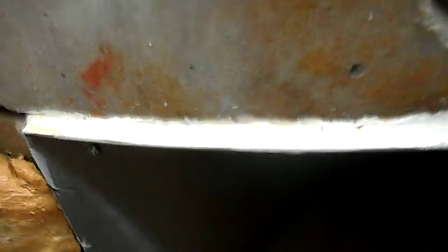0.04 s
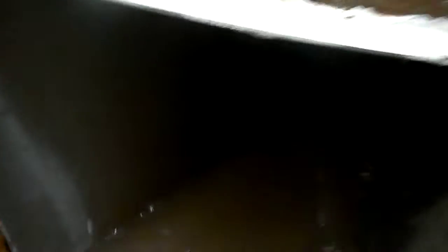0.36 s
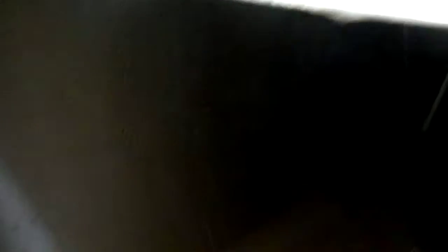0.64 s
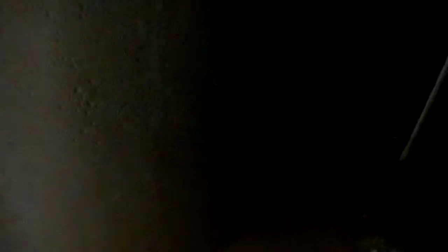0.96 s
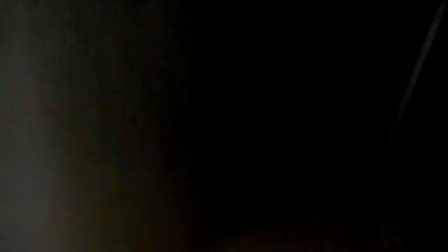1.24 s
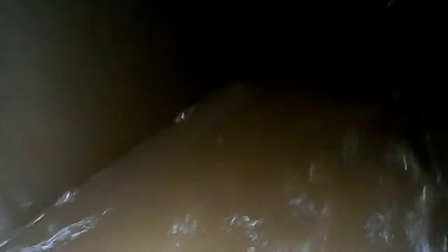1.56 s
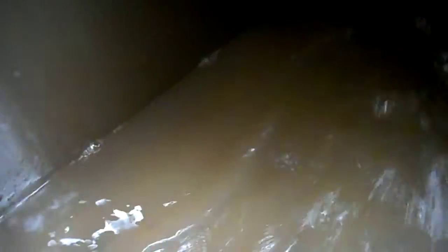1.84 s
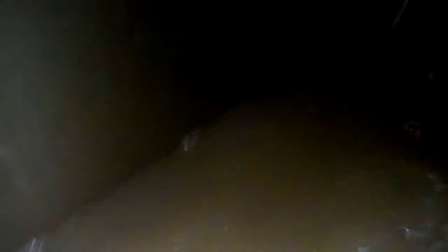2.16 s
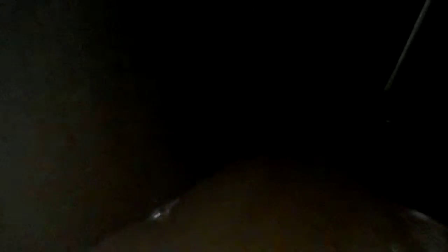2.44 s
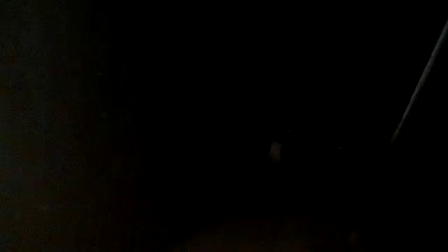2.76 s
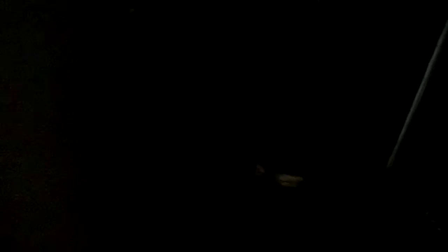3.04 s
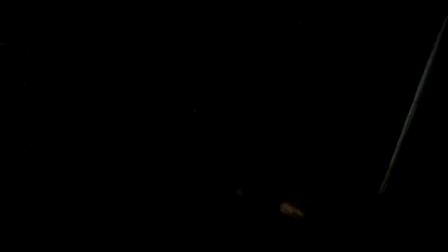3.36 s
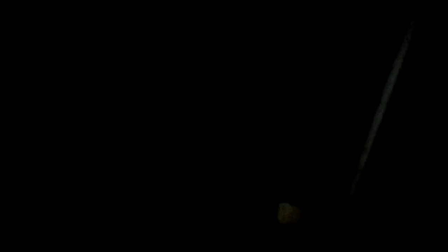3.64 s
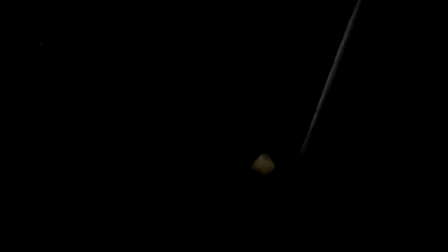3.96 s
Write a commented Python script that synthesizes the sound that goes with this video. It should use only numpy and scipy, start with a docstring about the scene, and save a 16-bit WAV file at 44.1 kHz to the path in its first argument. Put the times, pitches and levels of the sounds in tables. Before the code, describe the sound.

Turbulent water pours through a concrete drain channel, heard up close as a steady, foaming roar. Spray hisses, drops spatter, and brief splashes and hollow glugs keep breaking through, with a faint boom from the chamber underneath.

```python
"""Stormwater rushes through a concrete chamber, close by: white water with bubbles ringing out of it.
The churning flow throws up hissing spray and ticking droplets, roars, and gurgles in the hollows.
Now and then an air pocket glugs, a wave slaps, or the flow eases for a moment.
A low boom builds underneath, and the chamber's standing waves colour it all."""
import sys
import numpy as np
from scipy import signal
from scipy.fft import rfft, irfft, next_fast_len
from scipy.io import wavfile
from scipy.ndimage import uniform_filter1d, map_coordinates

SR = 44100
rng = np.random.default_rng(int(sys.argv[2]) if len(sys.argv) > 2 else 0)


def transcribe(signal):
    """Save signal, clipped to [-1, 1], as a 16-bit WAV file at the path in sys.argv[1]."""
    frames = np.atleast_2d(signal).T
    limited = np.clip(frames, -1, 1)
    pcm = np.round(limited * 32767).astype(np.int16)
    wavfile.write(sys.argv[1], SR, pcm)


N = 176400

TOP_HZ = 10700
SURGE_PER_S = 48  # quick swells of the flow and the spray
CHURN_DB, CHURN_PER_S = 1.04, 16  # slow heaving of the roar and the boom


def rush():
    """White water, with single bubbles ringing out of it, each rising in pitch."""
    # level ride of the foam (time [s], level [dB])
    foam_level = [(0, -26.5), (.45, -26), (.95, -24.5), (1.3, -25.5), (1.8, -25.5), (2.6, -25), (3.1, -25),
                  (4, -25)]
    # midrange tone of the foam (frequency [Hz], relative level [dB])
    foam_tone = [(40, -63), (150, -44), (500, -18.5), (800, -1.5), (1250, 1), (1800, 0), (2500, 0),
                 (3500, -4.5), (5000, -17.5), (9000, -35), (12000, -59)]
    foam = amp(curve(foam_level)) * coloured(turbulence(patchy_db=1.0), foam_tone)
    bubbles = grains(count=2400, centre_hz=1406, spread=0.4536, cycles=25, scatter_db=4.5,
                     rise=0.094, samples=1400)
    bubbles = coloured(bubbles, [(60, -60), (400, -34), (650, -13.5), (1000, -2), (2000, -4.5)])
    return foam + amp(-34) * bubbles


def spray():
    """Thrown-up spray: a fine, fluttering hiss and the ticks of falling droplets."""
    # level ride of the spray (time [s], level [dB])
    spray_level = [(0, -27), (.42, -27), (.9, -28), (1.55, -28.5), (2.3, -29.5), (2.6, -28.5), (3.2, -30),
                   (3.6, -30.5), (3.9, -27.5), (4, -30.5)]
    # bright tone of the hiss (frequency [Hz], relative level [dB])
    hiss_tone = [(60, -67), (500, -24), (1800, -13), (3000, -2.5), (4000, -1), (5000, -2), (6500, -4.5),
                 (8000, -9), (9000, -13), (10000, -19.5), (10600, -36.5)]
    tick_tone = [(60, -45), (1000, -15), (4000, 0.5), (7500, -3.5), (9500, -4.5), (10600, -17)]
    hiss = coloured(turbulence(patchy_db=1.0), hiss_tone)
    ticks = grains(count=6000, centre_hz=5300, spread=0.44, cycles=1.7, scatter_db=4.0, samples=120)
    flutter_db = .5 * wobble(SURGE_PER_S)
    return amp(curve(spray_level) + flutter_db) * (hiss + amp(-6.5) * coloured(ticks, tick_tone))


def roar():
    """The deep, heaving churn of the main flow."""
    # level ride of the roar (time [s], relative level [dB])
    roar_level = [(0, -35.5), (.45, -34), (.62, -35.5), (.8, -32.5), (1.17, -35.5), (1.35, -32.5),
                  (1.6, -36), (2.1, -33), (2.7, -34.5), (3.3, -33.5), (4, -35)]
    # low-mid body of the roar (frequency [Hz], relative level [dB])
    roar_tone = [(60, -45), (140, -21.5), (230, -3), (310, -1), (450, 1.5), (600, 1), (740, 6), (1100, -7),
                 (2000, -14), (5000, -60)]
    level_db = curve(roar_level) + 1.3 + CHURN_DB * wobble(CHURN_PER_S)
    return amp(level_db) * coloured(turbulence(patchy_db=-0.25), roar_tone)


def gurgle():
    """The shifting flow rings each hollow in one long, wavering swell over a quieter steady ring."""
    # ringing hollows (pitch [Hz], half-width [Hz], level [dB], peak time [s], swell length [s])
    hollows = [(845, 39, -37, 1.97, 1.6), (891, 28, -37, 2.9, 1.3), (1046, 40, -37.5, 2, 1.8),
               (990, 55, -36.5, 3.83, 0.45), (1370, 110, -36, 3.35, 1.2), (1636, 83, -35.5, 3.57, 0.59)]
    floor_db, waver_db = -10.5, 1.5
    out = np.zeros(N)
    for hz, width, db, s, length in hollows:
        drive = np.maximum(swell(s, length), amp(floor_db)) * amp(waver_db * wobble(15))
        ring = filtered(rng.standard_normal(N), lambda f: 1 / (1 + ((f - hz) / width) ** 2))
        out += amp(db) * drive * unit(ring)
    return out


def glugs():
    """Large air pockets collapse: each note swells quickly, rises a little and rings away unsteadily."""
    # air pockets (start [s], pitch [Hz], peak level [dB], length [s])
    pockets = [(0.641, 808, -27.5, 0.044), (0.897, 521, -34, 0.1), (1.09, 1055, -30, 0.053),
               (1.157, 1033, -26.5, 0.073), (1.386, 1010, -27, 0.036), (1.488, 877, -22.5, 0.034),
               (1.562, 857, -26.5, .04), (1.824, 1045, -28.5, 0.057), (1.98, 1020, -28.5, .035),
               (2.03, 834, -27.5, .05), (2.125, 1050, -28.5, .04), (2.133, 899, -26.5, .04),
               (2.47, 905, -30, .04), (2.817, 739, -27, 0.03), (2.874, 895, -28, 0.063),
               (3.003, 1380, -25, 0.047), (3.083, 895, -26, .05), (3.295, 1272, -30, 0.04)]
    rise, waver = .02, 0.0122  # shares of the pitch: climb per length, unsteadiness
    out = np.zeros(N)
    for s, hz, db, length in pockets:
        age = np.clip((np.arange(N) / SR - s) / length, 0, 10)
        pitch = hz * (1 + rise * (np.minimum(age, 2) - .5) + waver * wobble(110))
        envelope = (2 * age) ** 2 * np.exp(2 - 4 * age)
        out += amp(db) * envelope * np.sin(2 * np.pi * np.cumsum(pitch) / SR)
    return out


def splashes():
    """Waves slap: each is a short swell of noise in its own band."""
    # wave slaps (peak time [s], relative level [dB], band centre [Hz], length [s])
    slaps = [(.315, -31.5, 7560, 0.06), (0.668, -29, 990, 0.045), (0.499, -32, 4000, .22),
             (0.51, -35, 5900, 0.016), (.745, -26, 4500, 0.015), (0.938, -25, 2900, 0.02),
             (1.087, -21, 2180, 0.023), (1.089, -28, 4200, .025), (1.313, -26.5, 2100, 0.03),
             (1.492, -25.5, 1500, 0.02), (1.509, -30, 3800, .05), (1.637, -29, 650, 0.048),
             (2.049, -26.5, 1730, 0.047), (2.059, -29, 6650, 0.026), (2.146, -25, 970, 0.037),
             (2.279, -28, 2150, .025), (2.485, -22, 4050, 0.017), (2.677, -24, 1320, 0.032),
             (2.843, -32, 8350, 0.016), (2.912, -22.5, 1600, 0.017), (3.017, -23, 1700, 0.013),
             (3.311, -24, 1490, 0.025), (3.675, -33, 1700, 0.038), (3.722, -27, 6800, 0.017),
             (3.921, -26, 2300, 0.06)]
    half_width_octaves, trim_db = 0.4, -1.25
    size = SR // 2
    t = np.arange(size) / SR - size / SR / 2  # zero at the slap's peak
    hz = np.fft.rfftfreq(size, 1 / SR)
    out = np.zeros(N + size)
    for s, db, centre_hz, length in slaps:
        octaves = np.log2((hz + 1) / centre_hz)
        band = np.exp(-.5 * (octaves / half_width_octaves) ** 2) / (1 + (hz / 9600) ** 16)
        noise = unit(irfft(rfft(rng.standard_normal(size)) * band, size))
        envelope = np.exp(-2 * (t / length) ** 2)
        out[round(s * SR):][:size] += amp(db + trim_db) * envelope * noise
    return out[size // 2:][:N]


def spatter():
    """Larger drops strike close by with sharp, broadband ticks."""
    tick_tone = [(60, -51), (500, -8), (1500, 6), (7000, -3), (9500, -4), (10600, -23)]
    ticks = grains(count=420, centre_hz=3970, spread=0.33, cycles=0.91, scatter_db=2.0, samples=80)
    return amp(-42) * coloured(ticks, tick_tone)


def boom():
    """The chamber's bass heaves and builds as the listening point moves inside."""
    # low end of the chamber (frequency [Hz], relative level [dB])
    boom_tone = [(25, -35), (45, -32), (80, -11), (130, -6), (170, 1), (230, -4.5), (400, -33), (1000, -55)]
    build_db_per_s = 1.1
    level_db = -53.5 + build_db_per_s * (np.arange(N) - N / 2) / SR + CHURN_DB * wobble(CHURN_PER_S)
    return amp(level_db) * coloured(rng.standard_normal(N), boom_tone)


def chamber(water):
    """Standing waves in the concrete chamber lift some low bands and hollow out others."""
    # peaks and notches of the standing waves (centre [Hz], width [Hz], gain [dB])
    modes = [(82, 10, -1), (100, 7.4, -8), (174, 12, 2.5), (205.4, 10.8, -14.5), (235, 15, 2),
             (260, 11, -3), (503, 30, 3.5), (595, 36, 2)]

    def response(hz):
        return amp(sum(db * np.exp(-.5 * ((hz - centre) / width) ** 2) for centre, width, db in modes))
    return filtered(water, response)


def turbulence(patchy_db):
    """White noise with short patches of random gain across time and frequency."""
    spectrum = signal.stft(rng.standard_normal(N), nperseg=512)[2]
    patches = uniform_filter1d(rng.standard_normal(spectrum.shape), size=9, axis=0)
    patches = unit(uniform_filter1d(patches, size=7, axis=1))
    return unit(signal.istft(spectrum * amp(patchy_db * patches), nperseg=512)[1][:N])


def grains(count, centre_hz, spread, cycles, scatter_db, samples, rise=0):
    """Damped sine pings at random times, pitches and strengths; rise bends each one upward."""
    when, pitch, strength = rng.random(count), rng.standard_normal(count), rng.exponential(size=count)
    hz = np.clip(centre_hz * np.exp(spread * pitch), 250, TOP_HZ)[:, None]
    turns = hz * np.arange(samples) / SR
    age = turns / cycles
    bend = 1 + rise * np.minimum(age, 2) / 2
    envelope = np.exp(-np.pi * age) * (1 - np.exp(-2 * turns))
    gain = amp(scatter_db * np.minimum(strength, 4))[:, None]
    pings = gain * envelope * np.sin(2 * np.pi * turns * bend)
    at = (when * N).astype(int)[:, None] + np.arange(samples)
    return unit(np.bincount(at.ravel(), pings.ravel(), N)[:N])


def amp(db):
    """Decibels to gain."""
    return 10 ** (np.asarray(db) / 20)


def unit(x):
    """x scaled to rms 1."""
    return x / np.sqrt(np.mean(x ** 2) + 1e-20)


def curve(rows):
    """Straight ramps through (time [s], value) points."""
    return np.interp(np.arange(N) / SR, *np.transpose(rows))


def swell(s, length):
    """A bell-shaped swell around time s."""
    return np.exp(-2 * ((np.arange(N) / SR - s) / length) ** 2)


def wobble(rate):
    """A smooth random curve with rate knots a second."""
    return map_coordinates(rng.standard_normal(2048), [np.arange(N) * rate / SR], mode="wrap")


def filtered(x, response):
    """x through an EQ whose gain is response(hz)."""
    size = next_fast_len(N + SR // 2)
    return irfft(rfft(x, size) * response(np.fft.rfftfreq(size, 1 / SR)), size)[:N]


def coloured(x, tone):
    """x shaped by (frequency [Hz], relative level [dB]) points, at rms 1."""
    f, db = np.transpose(tone)
    return unit(filtered(x, lambda hz: amp(np.interp(np.log(hz + 1), np.log(f), db))))


def scene():
    """The flow surges and eases as one; boom, slaps and glugs join it in the chamber."""
    # lulls in the flow (time [s], depth [dB], length [s])
    lulls = [(0.086, 1.5, .06), (0.822, 2, 0.036), (1.02, 4.5, 0.021), (1.724, 2.3, 0.011),
             (1.889, 1.5, .018), (2.37, 1.5, 0.078), (2.782, 3, 0.045), (3.62, 1.5, 0.039),
             (3.747, 1.5, 0.016)]
    surge_db = 0.47 * wobble(SURGE_PER_S)
    lull_db = sum(depth * swell(s, length) for s, depth, length in lulls)
    bass = boom()
    flow = amp(surge_db - lull_db) * (roar() + gurgle() + rush() + spray() + spatter())
    return chamber(bass + flow + splashes() + glugs())[None]


def record(dry):
    """A brick-wall high cut at TOP_HZ."""
    return filtered(dry[0], lambda hz: hz < TOP_HZ)[None]


dry = scene()
out = record(dry)
transcribe(out)
```